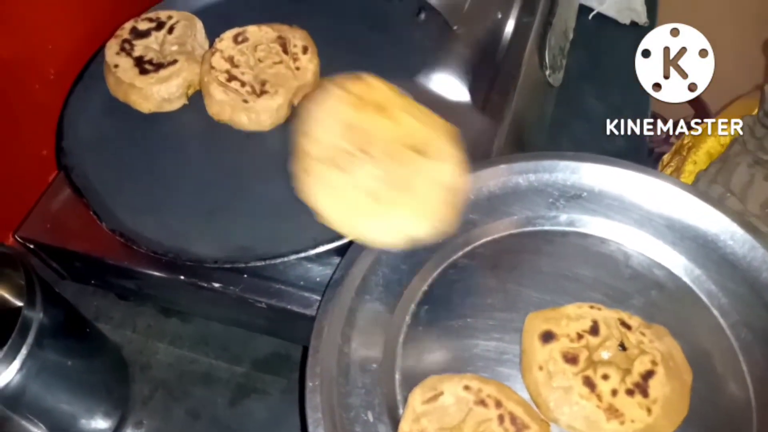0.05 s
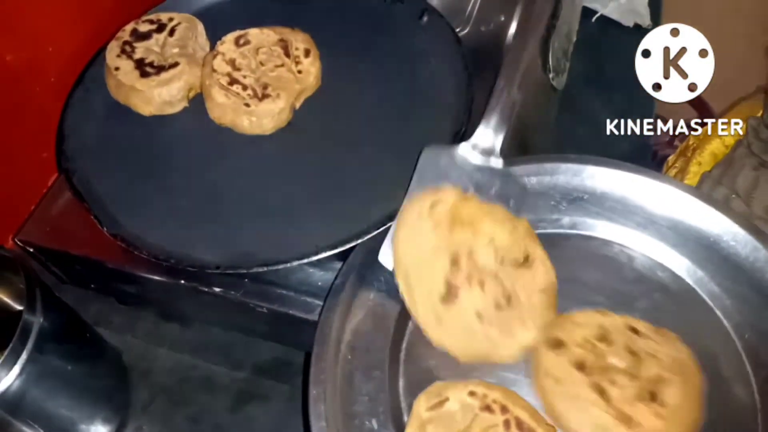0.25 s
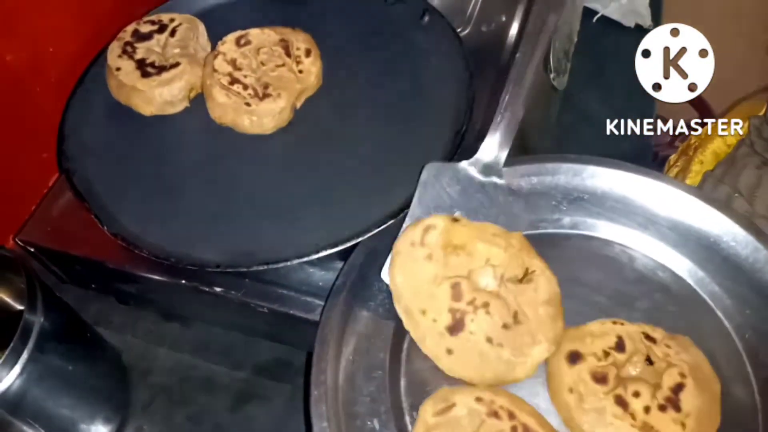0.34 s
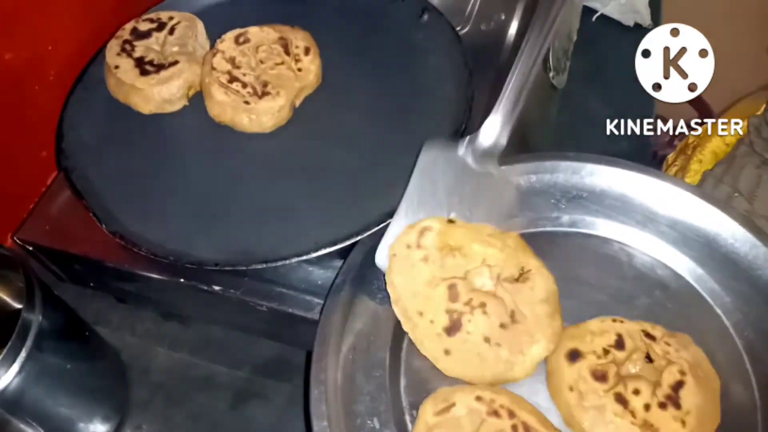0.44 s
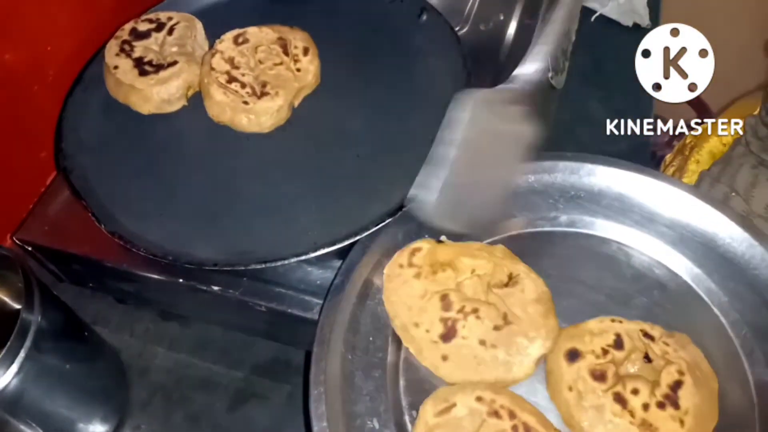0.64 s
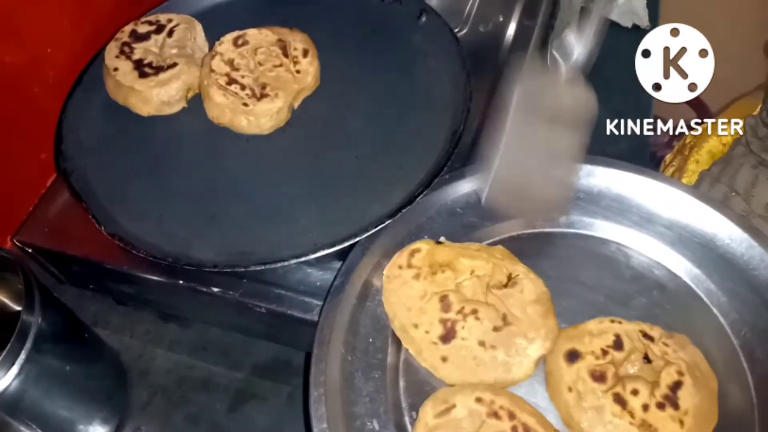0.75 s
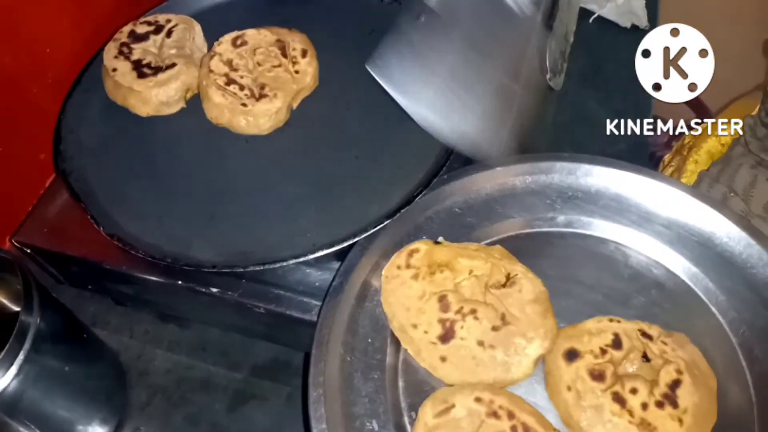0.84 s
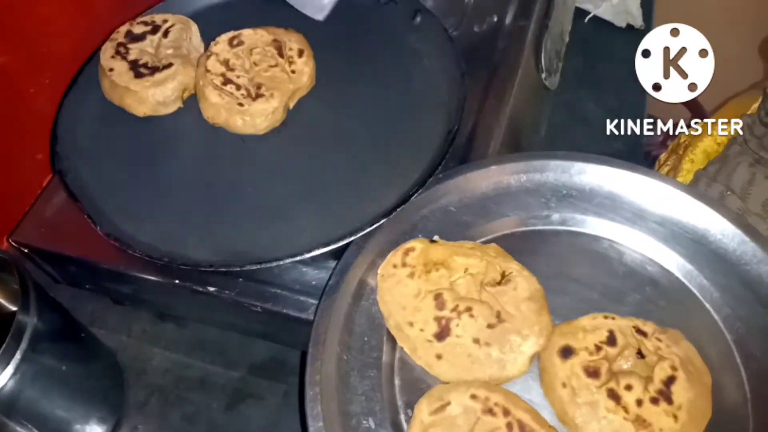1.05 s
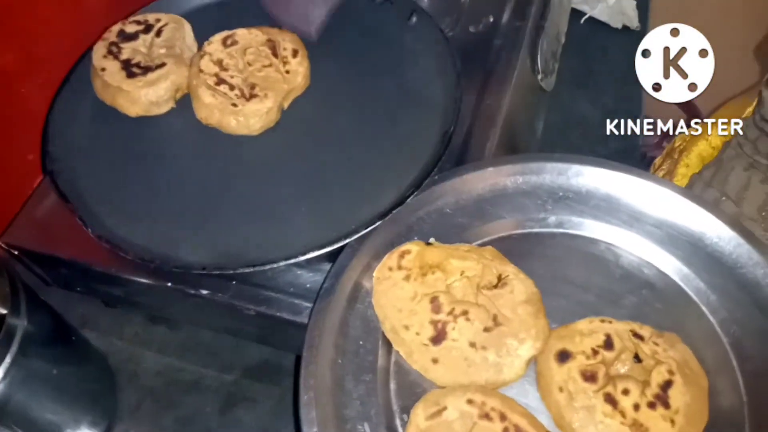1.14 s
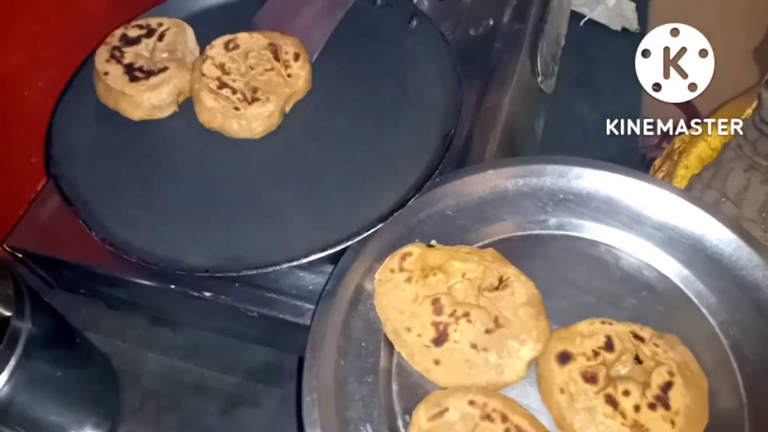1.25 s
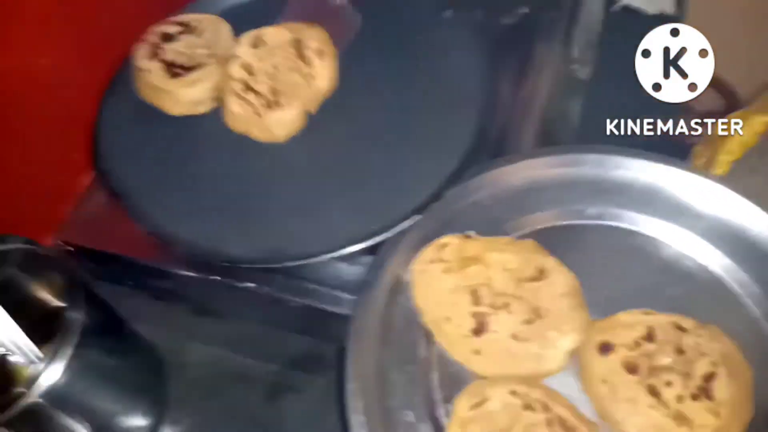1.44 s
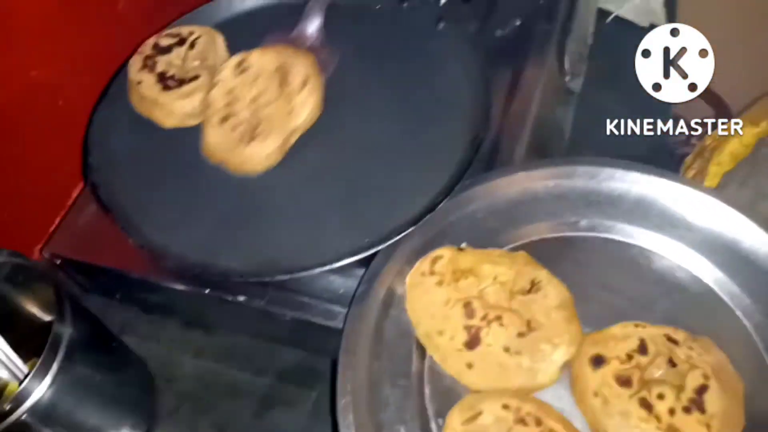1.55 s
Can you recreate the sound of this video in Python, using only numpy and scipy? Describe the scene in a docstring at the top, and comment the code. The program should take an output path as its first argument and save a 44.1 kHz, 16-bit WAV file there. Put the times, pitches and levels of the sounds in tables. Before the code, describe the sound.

A metal spatula clacks several times on a thin steel plate, which rings, and scrapes off its rim. After a pause it knocks twice on an iron griddle and scrapes along it. Faint sizzling continues, heard close in a kitchen.

```python
"""Small kitchen. A steel spatula sets a flatbread on a steel plate, clacks a few times, slips off the
rim, then knocks twice on a flat iron griddle and scrapes under the next bread. Each blow is a noisy
clash plus ringing modes; each scrape is friction driving resonances. A soft shuffle and low microphone
rumble lie underneath. The hot griddle sizzles and whistles faintly throughout; oil spits twice."""
import sys
import numpy as np
from scipy import signal
from scipy.fft import rfft, irfft
from scipy.io import wavfile

SR = 44100
rng = np.random.default_rng(int(sys.argv[2]) if len(sys.argv) > 2 else 0)


def master_out(mix):
    """Clip the mix to full scale and print it as 16-bit PCM to the path in sys.argv[1]."""
    frames = np.transpose(np.atleast_2d(mix))
    ceiling = np.clip(frames, -1, 1)
    pcm = np.round(ceiling * 32767).astype(np.int16)
    wavfile.write(sys.argv[1], SR, pcm)


N = 70560
T = np.arange(N) / SR
HZ = np.maximum(np.arange(N // 2 + 1) * SR / N, 1)

# spatula on plate: start_s, clash_db, bass_db, treble_db, chatter_s, tail_db,
# plate_db, blade_db, wobble_db, blade_share
PLATE_BLOWS = [(0.202, -22.5, -7.5, -1.5, 0.012, -6, -43.5, -50, -68, 1.0),
               (.232, -26.5, 1.5, -20, 0.02, -3, -55, -57.5, -48, 0.04),
               (0.332, -25.5, -0.5, -17.5, 0.01, -5, -48.5, -61, -45.5, 0),
               (0.4366, -30.5, 6.5, 3, 0.017, -6, -34, -38.5, -46, 0.6),
               (0.6142, -31.5, -15, -1, 0.021, -0.5, -49.5, -38, -62, 0.71)]
# spatula on griddle: start_s, clash_db, bass_db, treble_db, chatter_s, tail_db,
# iron_db, blade_db, wobble_db
GRIDDLE_BLOWS = [(1.2431, -28.5, -10, -7.5, 0.016, -7.5, -40, -43.5, -50),
                 (1.3241, -28, -6.5, 3.5, .011, -5.5, -42, -30, -55)]
# strokes along the iron: peak_s, rise_s, fall_s, body_db, hiss_db
GRIDDLE_SCRAPES = [(.09, 0.098, 0.256, -73, -68.5), (1.443, 0.041, 0.076, -48.5, -54.5),
                   (1.511, 0.033, 0.057, -54, -67), (1.585, 0.045, 0.056, -51, -53.5)]
# swelling sounds: peak_s, rise_s, fall_s, level_db
RIM_SCRAPES = [(.39, 0.0119, .015, -73), (.494, 0.0042, 0.019, -38.5), (.670, .014, 0.027, -37.5)]
SQUEALS = [(.69, .016, 0.034, -48), (1.295, 0.033, 0.033, -51)]
BREAD_LIFT = [(.075, 0.046, 0.053, -63.5)]
SHUFFLE = [(1.005, 0.021, 0.048, -63)]
MIC_RUMBLE = [(.66, 0.15, 0.073, -67), (1.04, 0.027, 0.3, -79.5)]
# ringing modes: pitch_hz, level_db, t60_s
PLATE_MODES = [(393.5, 0.5, 0.27), (458, -3, 0.076), (588, 1, 0.094), (696, -9.5, 0.36), (870, -12.5, 0.27),
               (1083, -16, .25), (1230, -2.5, 0.076), (1314, -11.5, 0.44), (2050, -7.5, 0.28),
               (2424, -7, 0.24), (3008, -4.5, 0.18), (3890, -8, 0.22), (4339, -0.5, 0.25),
               (4480, -0.5, 0.2)]
PLATE_WOBBLE = [(94.1, 3.5, 0.4), (180, -7.5, 0.44), (205.2, 0.5, 0.34)]
BLADE_MODES = [(2266, -7.5, 0.35), (2457, -6.5, 0.39), (2882, -7, .3), (3570, -8, 0.38), (4010, -12, 0.77),
               (4355, -4.5, .3), (4450, -0.5, 0.18), (5250, -10.5, 0.48), (5237, 3, 0.19),
               (5840, -10.5, 0.32), (6140, -6, 0.35), (6630, -6, 0.43), (6954, -2, 0.34), (9830, -6, 0.38)]
PRESSED_BLADE_MODES = [(2998, -8, 0.11), (3257, -5, 0.063), (3540, -9.5, 0.16), (4400, -3, 0.099),
                       (4940, -15, 0.16), (4720, -0.5, 0.074), (5600, -26, .15), (7060, -1, 0.047)]
GRIDDLE_MODES = [(470, -0.5, 0.28), (509.6, -5.5, 0.35), (562, -3.5, 0.36), (613, -3, 0.28),
                 (956, -2, 0.42), (1065, -8, .25), (1646, -6, 0.29), (1890, -10.5, 0.24), (2100, -8, 0.11),
                 (3130, 2, .15)]
GRIDDLE_WOBBLE = [(92.8, -17, 1), (206.8, 5, 0.27)]
# clusters of quickly damped modes: centre_hz, half_width_hz, boost_db
BLADE_CLUSTERS = [(465, 72, -11), (1040, 44, 16), (2465, 230, 8), (2883, 40, 17.5), (3524, 74, 13),
                  (4060, 100, 14.5), (4520, 90, 10.5), (5400, 480, 6), (6100, 120, 15), (6345, 150, 12),
                  (6850, 110, 16), (8060, 90, 15.5), (8480, 130, 11), (9370, 180, 13.5), (10090, 38, 16)]
PLATE_CLUSTERS = [(484, 160, 7.4), (912, 110, 9.3), (1334, 110, 4.6), (1675, 120, 7.4), (2096, 160, 10),
                  (2476, 23, 3), (3032, 98, 14.3), (3823, 150, 15), (4620, 200, 7), (4920, 130, 15),
                  (5680, 120, 15), (6570, 170, 12), (7290, 120, 20), (10746, 70, 17)]
GRIDDLE_CLUSTERS = [(484, 134, 7), (930, 153, 14.1), (1352, 57, 13.3), (1700, 150, 8.2), (2000, 195, 14.7),
                    (2640, 165, 8.8), (2985, 156, 11.7), (3520, 130, 11.7), (4567, 150, 17), (4960, 180, 8),
                    (5380, 160, 6.4), (5760, 110, 11.2), (7140, 270, 13), (8600, 110, 6)]
# resonances under the sliding blade: pitch_hz, width_hz, density_db
SLIDE_RESONANCES = [(540, 47, 4.5), (944, 127, -3), (1750, 68, -12.5), (2640, 170, -12.5), (4460, 65, -4),
                    (4846, 35, 1), (5800, 130, -12), (6600, 35, -9), (6850, 45, -0.5), (7000, 32, -8.5),
                    (7930, 22, -18), (9700, 70, -17)]
# noise spectra: freq_hz, density_db
PLATE_SPECTRUM = [(100, -5.5), (230, -12.5), (400, 2.5), (750, -5), (1500, -1.5), (3000, 0), (6300, -1.5),
                  (8200, -7), (9700, -1.5), (11000, -9.5), (13000, -20.5), (15000, -9.5)]
GRIDDLE_SPECTRUM = [(100, -30), (280, 0.5), (500, 9), (750, 0.5), (1900, -4.5), (2400, -3.5), (3100, 4.5),
                    (4000, -3.5), (4800, 1.5), (7000, -7.5), (9000, -7), (13000, -25), (15000, -24)]
SHUFFLE_SPECTRUM = [(55, 8), (130, -12.5), (360, 5), (700, -12), (2000, -6.5), (5000, -10), (12000, -35)]
SIZZLE_SPECTRUM = [(40, -9.5), (75, 1.5), (130, -7.5), (200, -11.5), (450, -19.5), (1400, -17.5),
                   (2400, -8), (4000, -1), (6500, 0), (9000, -3.5), (11000, -9), (13000, -26.5),
                   (15000, -11.5)]
# hot stove whistles: start_hz, end_hz, width_hz, peak_s, swell_s, level_db
WHISTLES = [(7945, 7935, 4, 1.0, .8, -66), (10350, 9150, 110, .9, 1.5, -68), (4030, 3950, 60, .9, .5, -73)]
# oil spits: peak_s, level_db
SPITS = [(1.39, -39.5), (1.423, -44)]

BASS_HZ, TREBLE_HZ = 1204, 5940
CONTACT_RISE_S, CRACK_S, CRACK_DB = 0.00021, 0.001, -25.5
TAIL_RISE_S, TAIL_SPLIT_HZ, LOW_T60_S, HIGH_T60_S = 0.006, 3000, 0.44, 0.26
MODE_SPREAD_DB, WOBBLE_RISE_CYCLES, SCRAPE_GRAIN_DB = 1.5, 2.77, 2.5
SIZZLE_DB, SPIT_S = -61.5, 0.0013


def plate():
    """Spatula clacks on the thin plate, which rings and wobbles, and drags over its rim."""
    blade_boost_db, plate_boost_db = cluster_db(BLADE_CLUSTERS), cluster_db(PLATE_CLUSTERS)
    hiss = coloured(grains(), PLATE_SPECTRUM, blade_boost_db / 2)
    hiss = highpass(hiss, hz=2000, order=1)
    out = swells(RIM_SCRAPES) * unit_rms(rubbed(BLADE_MODES) + from_db(-0.5) * hiss)
    for start_s, *contact, plate_db, blade_db, wobble_db, blade_share in PLATE_BLOWS:
        boost_db = blade_share * blade_boost_db + (1 - blade_share) * plate_boost_db
        out += clash(PLATE_SPECTRUM, boost_db, start_s, *contact)
        out += struck(PLATE_MODES, start_s, plate_db)
        out += struck(BLADE_MODES, start_s, blade_db)
        out += struck(PLATE_WOBBLE, start_s, wobble_db, WOBBLE_RISE_CYCLES)
    return out


def griddle():
    """Blade knocks and slides on the iron, which hums as the first bread lifts off."""
    friction, boost_db = grains(), cluster_db(GRIDDLE_CLUSTERS)
    slide = sum(from_db(db) * np.sqrt(width_hz) * resonate(friction, hz, width_hz)
                for hz, width_hz, db in SLIDE_RESONANCES)
    body = unit_rms(slide) + from_db(-7) * rubbed(GRIDDLE_MODES)
    hiss = highpass(coloured(friction, GRIDDLE_SPECTRUM, boost_db), hz=1490, order=1)
    out = sum(swell(*timing, body_db) * body + swell(*timing, hiss_db) * hiss
              for *timing, body_db, hiss_db in GRIDDLE_SCRAPES)
    for start_s, *contact, iron_db, blade_db, wobble_db in GRIDDLE_BLOWS:
        out += clash(GRIDDLE_SPECTRUM, boost_db, start_s, *contact)
        out += struck(GRIDDLE_MODES, start_s, iron_db)
        out += struck(PRESSED_BLADE_MODES, start_s, blade_db)
        out += struck(GRIDDLE_WOBBLE, start_s, wobble_db, WOBBLE_RISE_CYCLES)
    return out + swells(BREAD_LIFT) * thin_tone(hz=598, width_hz=26)


def clash(spectrum, boost_db, start_s, level_db, bass_db, treble_db, chatter_s, tail_db):
    """Metal cracks and chatters on metal; dense weak modes and the kitchen carry a tail."""
    age_s = np.maximum(T - start_s, 0)
    shelves_db = bass_db / (1 + (HZ / BASS_HZ) ** 2) + treble_db / (1 + (TREBLE_HZ / HZ) ** 4)
    bins = rfft(coloured(rng.standard_normal(N), spectrum, boost_db)) * from_db(shelves_db)
    noise = irfft(bins, N)
    lows = irfft(bins / (1 + (HZ / TAIL_SPLIT_HZ) ** 2), N)
    crack = noise * from_db(CRACK_DB) * np.exp(-age_s / CRACK_S)
    chatter = noise * bell(age_s / chatter_s)
    tail = lows * decay(age_s, LOW_T60_S) + (noise - lows) * decay(age_s, HIGH_T60_S)
    tail *= from_db(tail_db) * (1 - np.exp(-age_s / TAIL_RISE_S))
    onset = 1 - bell(age_s / CONTACT_RISE_S)
    return highpass(from_db(level_db) * onset * (crack + chatter + tail), hz=217, order=4)


def struck(modes, start_s, level_db, rise_cycles=1):
    """A blow rings each mode with random sign and strength."""
    age_s = np.maximum(T - start_s, 0)
    out = np.zeros(N)
    for hz, mode_db, t60_s in modes:
        gain = rng.choice([-1, 1]) * from_db(level_db + mode_db + MODE_SPREAD_DB * rng.standard_normal())
        onset = 1 - bell(age_s * hz / rise_cycles)
        out += gain * onset * decay(age_s, t60_s) * np.sin(2 * np.pi * hz * age_s)
    return out


def rubbed(modes):
    """Friction keeps modes ringing; unit RMS."""
    friction = grains()
    return unit_rms(sum(from_db(db) * resonate(friction, hz, width_hz=np.log(1000) / np.pi / t60_s)
                        for hz, db, t60_s in modes))


def squeals():
    """Brief high squeals of the blade."""
    return swells(SQUEALS) * thin_tone(hz=7690, width_hz=8.7)


def shuffle():
    """Soft shuffle as the hand moves back."""
    return swells(SHUFFLE) * coloured(grains(), SHUFFLE_SPECTRUM)


def mic_rumble():
    """Low microphone rumble."""
    return swells(MIC_RUMBLE) * resonate(rng.standard_normal(N), hz=60, width_hz=14)


def sizzle():
    """Hot griddle: even sizzle, thin whistles, oil spits."""
    out = from_db(SIZZLE_DB) * coloured(grains(spread_db=1), SIZZLE_SPECTRUM)
    for start_hz, end_hz, width_hz, peak_s, swell_s, db in WHISTLES:
        glide_hz = np.linspace(start_hz, end_hz, N)
        out += swell(peak_s, swell_s, swell_s, db) * thin_tone(glide_hz, width_hz)
    spits = sum(swell(peak_s, SPIT_S, SPIT_S, db) for peak_s, db in SPITS) * rng.standard_normal(N)
    return out + highpass(spits, hz=11500, order=2)


def thin_tone(hz, width_hz):
    """Sine with wandering phase; unit RMS."""
    wander_rad = np.sqrt(2 * np.pi * width_hz / SR) * rng.standard_normal(N)
    wander_rad = signal.sosfilt(signal.butter(2, 2 * width_hz + 10, fs=SR, output="sos"), wander_rad)
    return np.sqrt(2) * np.sin(np.cumsum(2 * np.pi * hz / SR + wander_rad))


def grains(spread_db=SCRAPE_GRAIN_DB):
    """Dense tiny contacts: noise with a new level every 40 samples."""
    noise = rng.standard_normal(N)
    level_db = spread_db * np.repeat(rng.standard_normal(N // 40 + 1), 40)[:N]
    return noise * from_db(level_db)


def resonate(x, hz, width_hz):
    """One driven resonance; unit RMS."""
    radius = np.exp(-np.pi * width_hz / SR)
    feedback = [1, -2 * radius * np.cos(2 * np.pi * hz / SR), radius ** 2]
    return unit_rms(signal.lfilter([1, 0, -1], feedback, x))


def coloured(x, spectrum, boost_db=0):
    """Impose a spectrum; unit RMS."""
    hz, db = np.transpose(spectrum)
    gain_db = np.interp(np.log(HZ), np.log(hz), db) + boost_db
    return unit_rms(irfft(rfft(x) * from_db(gain_db), N))


def cluster_db(clusters):
    """Boost per frequency from mode clusters."""
    return sum(db * bell((HZ - hz) / half_width_hz) for hz, half_width_hz, db in clusters)


def swell(peak_s, rise_s, fall_s, level_db):
    """Smooth rise and fall."""
    return from_db(level_db) * bell((T - peak_s) / np.where(T < peak_s, rise_s, fall_s))


def swells(rows):
    return sum(swell(*row) for row in rows)


def bell(x):
    return np.exp(-x ** 2)


def decay(age_s, t60_s):
    return np.exp(-np.log(1000) * age_s / t60_s)


def highpass(x, hz, order):
    return signal.sosfilt(signal.butter(order, hz, "high", fs=SR, output="sos"), x)


def from_db(db):
    return 10 ** (np.asarray(db) / 20)


def unit_rms(x):
    return x / np.sqrt(np.mean(x ** 2) + 1e-20)


def scene():
    """All sources, close, mono."""
    return (plate() + griddle() + squeals() + shuffle() + mic_rumble() + sizzle())[None]


def record(dry):
    """Steep low-pass at 15.6 kHz."""
    return signal.sosfilt(signal.ellip(10, .2, 70, 15600, fs=SR, output="sos"), dry)


dry = scene()
out = record(dry)
master_out(out)
```